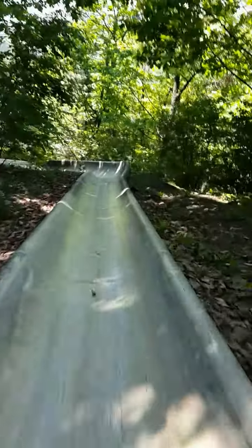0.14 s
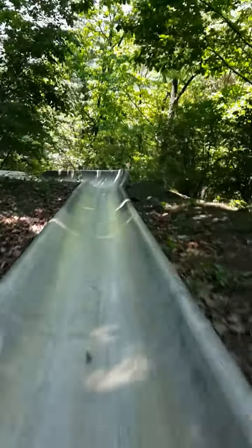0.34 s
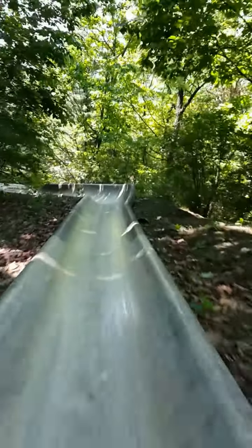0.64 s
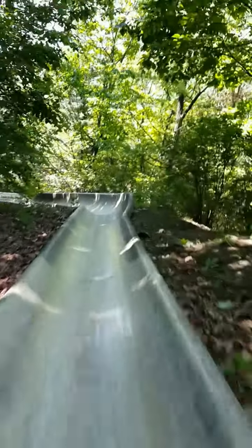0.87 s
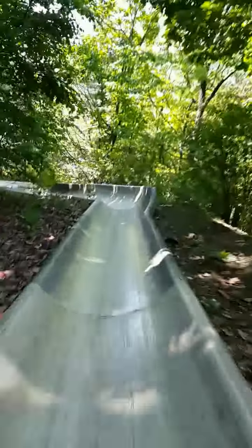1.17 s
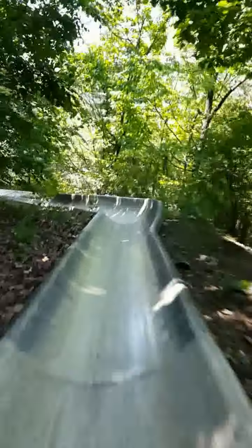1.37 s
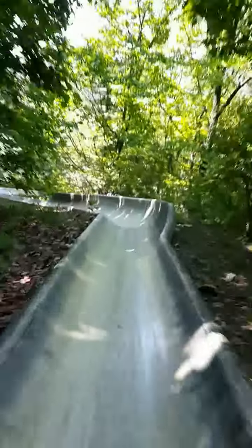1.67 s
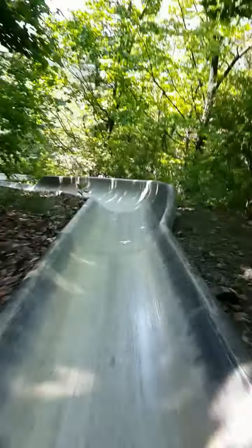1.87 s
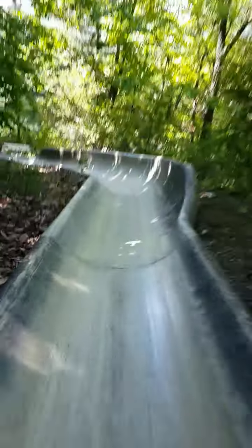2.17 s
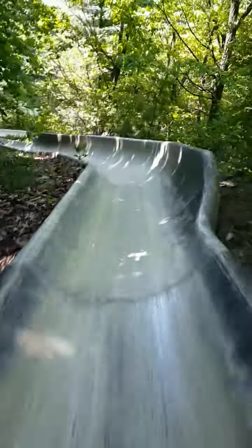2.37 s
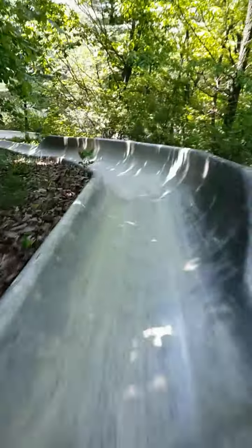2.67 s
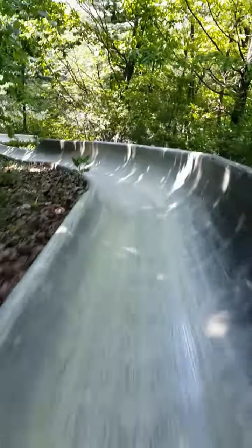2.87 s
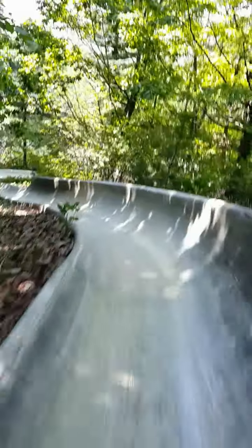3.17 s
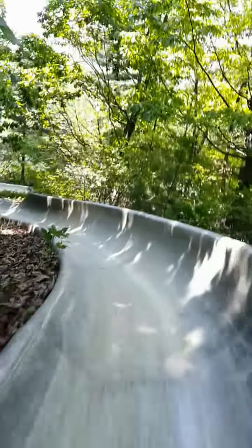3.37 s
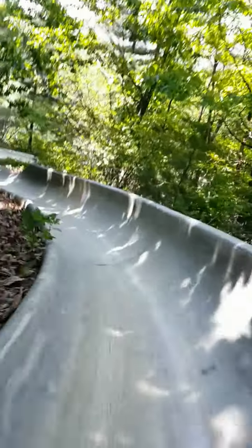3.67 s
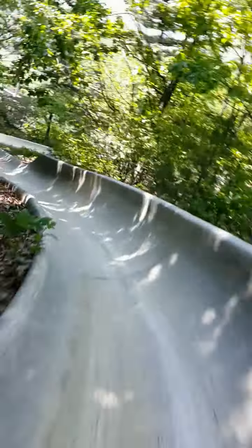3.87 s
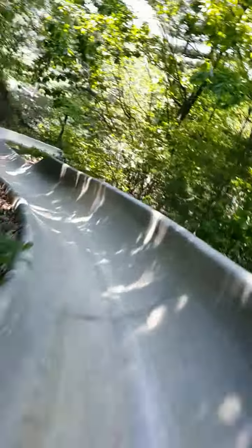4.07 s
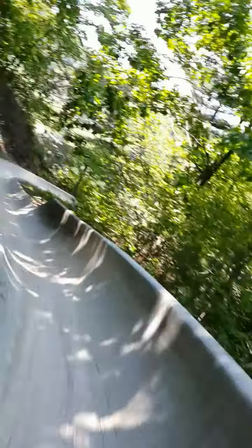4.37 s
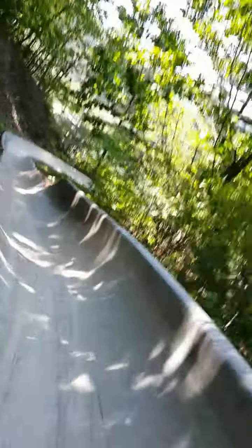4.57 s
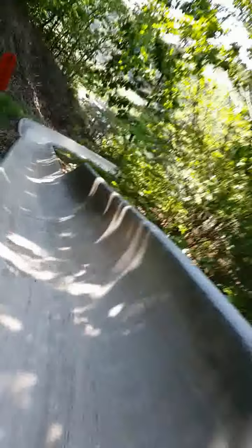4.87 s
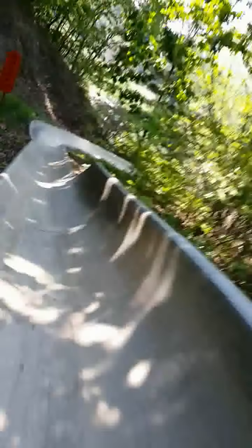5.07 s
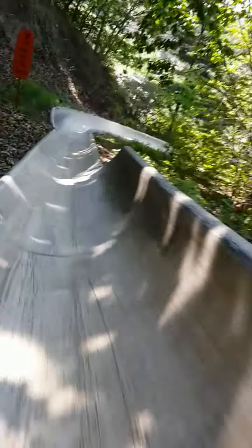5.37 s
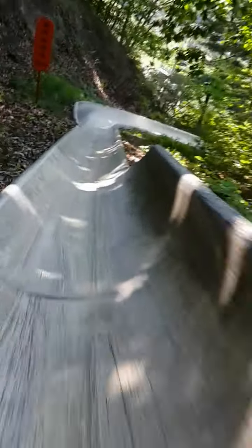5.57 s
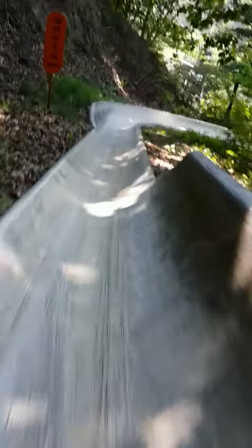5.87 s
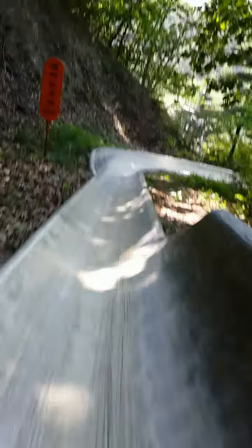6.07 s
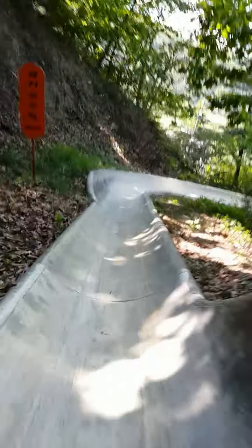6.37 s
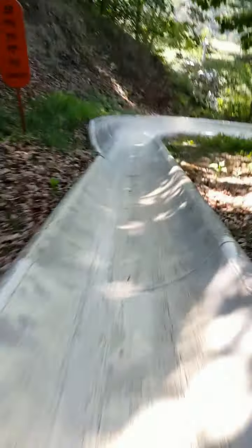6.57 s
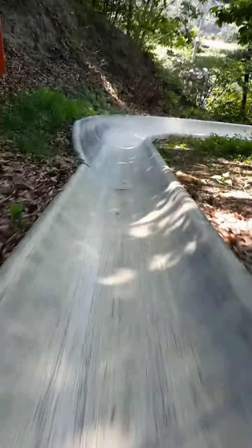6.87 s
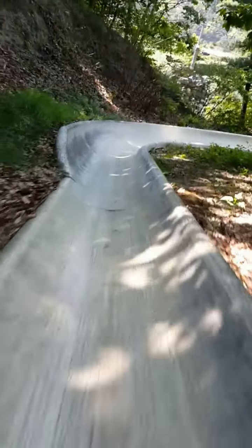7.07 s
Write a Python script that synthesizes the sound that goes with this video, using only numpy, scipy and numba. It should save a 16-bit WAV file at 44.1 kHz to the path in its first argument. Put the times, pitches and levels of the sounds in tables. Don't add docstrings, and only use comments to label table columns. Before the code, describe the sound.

A sled on rollers runs down a sheet-metal trough outdoors, captured very close by a handheld phone. Throughout there is a loud, bass-heavy rumble around 50 to 200 hertz, throbbing roughly eleven times a second, under muffled shell drone, loose rattling and faint gritty scraping. At 0.46 s a joint clanks and the trough slams low; a double knock and slam follow at 1.5, and more at 2.5. A loose panel hums around 1.7 and from 2.7 to 3.3. From 3.5 to 4.5 the bend makes the metal groan and sing in short spells, the scrape rising. The rumble drops away just before 4.57, then returns with the deepest slam. Knocks, chatter and ticks cluster at 5.3 to 5.5, then 6.2. The rumble thins near 6.5, slams at 6.7, a sharp snap cracks at 6.81, and rolling continues to the abrupt end at about 7.2.

```python
import sys
import numpy as np
from scipy import signal
from scipy.fft import rfft, irfft, next_fast_len
from scipy.io import wavfile
from scipy.ndimage import uniform_filter1d
from numba import njit

SR = 44100
rng = np.random.default_rng(int(sys.argv[2]) if len(sys.argv) > 2 else 0)


def rack_gain(trim_db):
    fader = np.asarray(trim_db, float)
    return 10 ** (fader / 20)


def to_wav(s):
    ch = np.atleast_2d(s).T
    pcm = np.round(np.clip(ch, -1, 1) * 32767)
    wavfile.write(sys.argv[1], SR, pcm.astype(np.int16))


N = 318843
SIZE = next_fast_len(N)
LOG_HZ = np.log(np.maximum(np.arange(SIZE // 2 + 1) * SR / SIZE, 1))
TIME = np.arange(N) / SR
COARSE_S = TIME[::16]
HIT_S = TIME[:SR // 5]


def curves(table):
    s, *columns = np.transpose(table)
    return [np.interp(TIME, s, c) for c in columns]


def swells(table, t=TIME):
    total = sum(db * np.exp(-.5 * ((COARSE_S - s) / max(width, .005)) ** 2) for s, db, width in table)
    return np.interp(t, COARSE_S, total)


def peaks(table):
    total = np.zeros(len(COARSE_S))
    for s, db, rise_s, fall_s in table:
        slope_s = np.where(COARSE_S < s, max(rise_s, .002), max(fall_s, .002))
        total += db * np.exp(-np.abs(COARSE_S - s) / slope_s)
    return np.interp(TIME, COARSE_S, total)


def walk(rate_hz):
    k = int(SR / rate_hz)
    steps = np.repeat(rng.standard_normal(N // k + 1), k)
    return 2.15 * uniform_filter1d(uniform_filter1d(steps, k), k)[:N]


def grit(rate_hz, spread_db, size=0.96):
    grains = (rng.random(N) < rate_hz / SR) * rack_gain(spread_db * rng.uniform(-0.58, 1, N))
    puffs = signal.lfilter([1], [1, -np.exp(-1 / (0.0023 * SR))], grains)
    return rng.standard_normal((2, N)) * (1 + size * puffs)


# pitch_hz, likeness_0_to_1, left_lead_rad, left_minus_right_db
PORT_DIFFERENCES = [(25, .7, .1, -2.5), (55.3, 1, 0.16, 3), (144, 1, 0.6, 2.5), (210, 0.91, 0.83, 2),
                    (306, 0.88, 1.14, 3), (448, 0.86, 1.78, 4), (770, 0.78, 3.12, 2.5),
                    (950, 0.6, 4.6, 2.5), (1150, 0.7, 4.56, -0.5), (1690, .35, 9.3, 1),
                    (2230, 0.03, 12.5, -1.5), (3300, 0.12, 7.4, 2), (4650, 0.15, 14, 4),
                    (6330, 0.3, 3.7, 4.5), (6700, 1, 32, 14.5)]


def ports():
    hz, like, lead_rad, db = np.transpose(PORT_DIFFERENCES)
    columns = (np.clip(like, 0, 1), lead_rad, db)
    like, lead_rad, db = (np.interp(LOG_HZ, np.log(hz), c) for c in columns)
    return like * np.exp(-1j * lead_rad) * rack_gain(-db), np.sqrt(1 - like ** 2) * rack_gain(-db)


def heard(pair, colour, right):
    hz, db = np.transpose(colour)
    gain = rack_gain(np.interp(LOG_HZ, np.log(hz), db, -120, -120))
    direct, scattered = rfft(pair, SIZE) * gain
    out = irfft(np.array([direct, right[0] * direct + right[1] * scattered]), SIZE)[:, :N]
    return out / np.std(out.mean(axis=0))


@njit
def revolve(fresh, lag, keep):
    y = np.zeros(len(fresh))
    for i in range(len(y)):
        back = i - int(lag[i])
        if back >= 0:
            y[i] = keep[i] * y[back] + np.sqrt(1 - keep[i] ** 2) * fresh[i]
        else:
            y[i] = fresh[i]
    return y


# time_s, turn_ms
TURNS = [(0, 96.5), (.8, 92.2), (1.3, 90.2), (3.35, 90.7), (4.4, 90), (4.9, 87.5), (5.6, 86.2),
         (6.15, 87.8), (7.23, 92)]
# time_s, lost_share
RENEWALS = [(1.5, .6), (2.47, .6), (3.53, .6), (4.55, .7), (5.4, .4), (6.15, .5), (6.7, .6), (7.1, .4)]


def roller_bumps():
    kept_share, renew_s = .8, .12
    keep = kept_share - swells([(s, lost, renew_s) for s, lost in RENEWALS])
    keep = np.clip(keep, 0, .95)
    lag = curves(TURNS)[0] * SR / 1000
    return np.array([revolve(row, lag, keep) for row in rng.standard_normal((2, N))])


# start_s, drumming_minus_boom_db, drone_db
SHEETS = [(0, -6, -1), (.5, -7.5, 0), (1.15, -15.5, -1), (1.75, -9.5, 0), (2.1, -21.5, -1.5),
          (2.45, -7.5, 0.5), (3.5, -13, 3.5), (3.8, -6.5, 2), (4.05, -6, 4), (4.57, -3.5, 5),
          (5.4, -7.5, 4), (6.05, -1, 4.5), (6.7, -5.5, 4), (6.95, -4, 0.5)]


def sheets():
    blend_s = 0.054
    s, *columns = np.transpose(SHEETS)
    under = np.maximum(np.searchsorted(s, TIME) - 1, 0)
    return [uniform_filter1d(c[under], int(blend_s * SR)) for c in columns]


# landing_s, lift_db, lead_in_s
HOPS = [(.464, -6.5, 0.016), (1.0, 1.5, 0.035), (1.597, -6, 0.15), (2.129, -3.5, 0.026), (2.416, -6, 0.052),
        (3.54, -12.5, 0.053), (4.569, -30.5, 0.068), (5.359, -8, 0.03), (6.67, -12, 0.043),
        (6.76, -3, 0.037), (7.26, -14, 0.11)]


def lift():
    landing_s = .02
    return peaks([(s, db, lead_s, landing_s) for s, db, lead_s in HOPS])


def stiffen(x):
    stiffening, width = .3, int(.016 * SR)
    size = uniform_filter1d(uniform_filter1d((x ** 2).mean(axis=0), width), width)
    return x * (np.maximum(size, 0) + .05) ** (-stiffening / 2)


# time_s, over_rest_db, half_width_s
PANEL_SWELLS = [(1.68, 17.5, 0.033), (1.95, 9.5, 0.05), (2.7, 14, 0.1), (3, 14, 0.12), (3.33, 16.5, 0.091)]
# pitch_hz, level_db
PANEL_HUM = [(215, -43.5), (240, 0.5), (253, -2), (266, -10), (295, -37.5)]


def panel(right):
    rest_db = -39.5
    return rack_gain(rest_db + swells(PANEL_SWELLS)) * heard(roller_bumps(), PANEL_HUM, right)


# time_s, over_rest_db, half_width_s
DECK_SWELLS = [(1, 8.5, 0.25), (1.5, 11.5, 0.11), (3.7, 6, 0.072), (3.97, 19, 0.19), (4.72, 17.5, 0.11),
               (5.5, 7, 0.46), (6.2, 14, 0.13), (7.03, 22, 0.014)]
# pitch_hz, level_db
DECK_RING = [(700, -41.5), (860, 0.5), (1000, -6.5), (1120, -2), (1350, -41)]


def deck(right):
    rest_db = -53
    return rack_gain(rest_db + swells(DECK_SWELLS)) * heard(grit(44, 3.1, 0.9), DECK_RING, right)


# time_s, rms_db, half_width_s, pitch_hz
SINGING = [(.35, -36, .03, 336), (1.1, -28, .06, 302), (3.3, -35.5, 0.086, 400), (3.57, -30.5, .03, 296),
           (3.75, -28, .025, 316), (3.88, -29, 0.08, 410), (4.0, -31.5, .04, 415), (3.9, -29.5, 0.11, 241),
           (4.16, -29, 0.022, 409), (4.24, -28, 0.048, 384), (4.35, -26, .04, 396), (4.35, -40, .015, 3510),
           (4.46, -38, .045, 3950), (4.62, -42.5, .02, 5040), (4.95, -38, .03, 4310),
           (4.27, -23, 0.065, 186), (6.72, -26, .05, 195), (4.72, -38, .03, 3200), (4.76, -40, .02, 4200),
           (2.04, -23, .06, 149), (5.46, -29.5, .015, 440), (5.485, -24, 0.017, 284),
           (5.8, -29, 0.069, 501), (6.0, -35, 0.035, 400), (6.3, -30, .04, 283), (6.33, -28.5, .025, 486),
           (6.4, -28, 0.017, 393), (6.52, -27.5, 0.037, 336), (6.59, -32, .025, 420)]


def singing(right):
    edges = 1 + np.array([-.5, .5]) * .1
    rough, out = rng.standard_normal((2, N)), np.zeros((2, N))
    for s, db, width_s, hz in SINGING:
        at = np.abs(TIME - s) < 3 * width_s + .05
        resonance = signal.butter(2, hz * edges, "bandpass", fs=SR, output="sos")
        tone = signal.sosfilt(resonance, rough[:, at])
        swell = np.exp(-.5 * ((TIME[at] - s) / max(width_s, .005)) ** 2)
        out[:, at] += rack_gain(db) * tone / np.std(tone) * swell
    direct, scattered = rfft(out, SIZE)
    return np.array([out[0], irfft(right[0] * direct + right[1] * scattered, SIZE)[:N]])


# time_s, peak_db, pitch_hz
TICKS = [(0.4495, -45, 5500), (.4615, -26, 5260), (.4625, -29, 3100), (1.4695, -25, 3400),
         (1.4693, -27, 1400), (0.465, -23.5, 1350), (5.325, -24.5, 1300), (.8854, -32, 3200),
         (1.3104, -28.5, 2920), (2.4768, -31, 3300), (2.573, -19, 1520), (2.5777, -29, 1700),
         (3.5543, -30, 3300), (4.457, -24, 3900), (5.3244, -20, 3300), (5.4742, -14.5, 3400),
         (5.4745, -16, 2300), (6.267, -19, 3300), (6.2664, -19, 2340), (6.8101, -5.5, 3750),
         (6.8105, -19.5, 2740), (6.8118, -20, 1800), (6.8135, -16, 3520), (6.8153, -21, 3000),
         (6.8257, -30, 3300), (6.829, -25, 3200), (2.5745, -25.5, 2100), (2.5755, -26, 1300),
         (.109, -36, 1300), (3.833, -21, 1150), (5.103, -18.5, 990), (4.572, -16, 1500)]


def ticks():
    out, cycles = np.zeros(N), 1.1
    for s, db, hz in TICKS:
        since = TIME - s
        out += rack_gain(db) * np.cos(2 * np.pi * hz * since) * np.exp(-(since * hz / cycles) ** 2)
    return out


# start_s, level_db, decay_s, upper_ring_db
CHATTER = [(.461, -33, 0.0061, -13), (0.467, -48, .012, 2), (1.47, -45, 0.0099, -7),
           (1.496, -39, 0.0099, -2), (1.527, -38, 0.038, -10.5), (2.478, -38.5, 0.032, -10),
           (2.575, -40, 0.027, -15), (4.7, -40.5, 0.044, -7.5), (4.91, -37, 0.064, -15),
           (4.537, -35, .006, -10), (4.618, -34, .008, 1), (5.324, -31, 0.013, -11),
           (5.338, -25, .014, -13), (5.37, -38, .01, -11), (5.465, -26, .012, -5), (6.812, -39, 0.004, -16),
           (6.825, -41, .008, -7)]
# pitch_hz, level_db
RUNNER_RING = [(2700, -31), (3050, 0), (3300, -5), (3600, -7), (4000, -33)]
RUNNER_TOP = [(4100, -26.5), (4500, -9.5), (5100, 4.5), (5400, -1.5), (5800, -27.5)]


def chatter(right):
    low, top = np.zeros((2, N))
    for s, db, decay_s, top_db in CHATTER:
        at = slice(int(s * SR), int(s * SR) + len(HIT_S))
        burst = (1 - np.exp(-HIT_S / 0.00083)) * np.exp(-HIT_S / max(decay_s, .002))
        low[at] = np.hypot(low[at], rack_gain(db) * burst)
        top[at] = np.hypot(top[at], rack_gain(db + top_db) * burst)
    return low * heard(grit(150, 2.5), RUNNER_RING, right) + top * heard(grit(170, 3), RUNNER_TOP, right)


# time_s, peak_db, dull_db, bright_db, clank_hz
KNOCKS = [(0.108, -27, 12.5, -23, 1160), (0.46, -15, -23, -12, 1336), (0.511, -23.5, 5, -16, 1200),
          (0.619, -21, 7.5, -13, 1040), (1.469, -19, -3, -11, 890), (1.485, -16, 2, -17, 910),
          (1.501, -23, -13, 0, 1050), (2.028, -30.5, 7, -11.5, 560), (2.475, -19.5, 2.5, -9.5, 830),
          (2.572, -17, 8, -15.5, 760), (2.817, -32.5, 14, -16, 560), (2.857, -35.5, 1, -19, 710),
          (2.968, -26, -1, -21.5, 950), (3.599, -17.5, -3, -10, 1310), (3.654, -27.5, -2, -27.5, 556),
          (3.832, -23.5, -5, -30.5, 1090), (3.923, -24, -3, -6, 1050), (4.536, -25.5, -2, -12.5, 1350),
          (4.57, -15.5, 10, -11, 1320), (4.5752, -18, -1, -12, 790), (4.586, -19, -6, -11.5, 950),
          (4.982, -15, -12.5, -29, 644), (5.103, -17.5, -23, -22, 930), (5.19, -21.5, 9, -23, 600),
          (5.324, -17.5, -1, -10, 1150), (5.343, -21, 12, -5, 820), (5.456, -14.5, -4, -28, 950),
          (5.473, -21.5, 9, -12.5, 1200), (5.764, -26, 3, -17.5, 566), (6.18, -17, 7.5, -14.5, 910),
          (6.187, -17.5, -19, -18, 870), (6.266, -17.5, 6.5, -27, 915), (6.732, -20, 6, -12.5, 740),
          (7.023, -23, -12, -28, 1060)]
# pitch_hz, level_db
SHELL = [(150, -25), (200, 3), (225, -1.5), (255, 0), (285, -1.5), (420, -0.5), (520, -6), (650, -23),
         (900, -43)]
RATTLE = [(400, -29.5), (550, 0), (700, 6), (950, -2), (1150, -7), (1500, -12), (1700, -18), (2000, -49.5)]
RUB = [(1200, -35), (1500, -4), (1700, -2), (2300, -8.5), (2600, -12.5), (3100, -39.5)]
GRIT = [(1900, -38.5), (2400, -8), (2900, -2.5), (3300, 0.5), (3750, -2.5), (4500, -3.5), (5300, -7.5),
        (6200, -12.5), (6700, -13.5), (7200, -11.5), (7400, -53)]


def knocks(right):
    ring_cycles, thump_hz, thump_s, port_lag_s = 104, 328, 0.008, 0.00086
    dull, middle, bright, clank = np.zeros((4, N))
    thump = np.sin(2 * np.pi * thump_hz * HIT_S) * np.exp(-HIT_S / thump_s)
    for s, db, dull_db, bright_db, hz in KNOCKS:
        at = slice(int(s * SR), int(s * SR) + len(HIT_S))
        burst = (1 - np.exp(-HIT_S / 0.00015)) * np.exp(-np.log(1000) * HIT_S * hz / ring_cycles)
        dull[at] = np.hypot(dull[at], rack_gain(db + dull_db - 5.0) * burst)
        middle[at] = np.hypot(middle[at], rack_gain(db - 9.5) * burst)
        bright[at] = np.hypot(bright[at], rack_gain(db + bright_db - 4.5) * burst)
        clank[at] += rack_gain(db - 4) * np.sin(2 * np.pi * hz * HIT_S) * burst * np.exp(-HIT_S / 0.0056)
        clank[at] += rack_gain(db + dull_db - 3.0) * thump
    parts = ((dull, SHELL), (middle, RATTLE), (middle * rack_gain(-9.0), RUB), (bright, GRIT))
    bursts = sum(shape * heard(rng.standard_normal((2, N)), colour, right) for shape, colour in parts)
    return bursts + np.array([clank, np.roll(clank, int(port_lag_s * SR))])


# time_s, peak_db, pitch_hz
SLAMS = [(0.4672, -6.5, 135.2), (1.475, -7.5, 125.9), (2.471, -9.5, 109.5), (3.4, -11.5, 95.4),
         (4.573, -4.5, 174.4), (5.471, -12.5, 134.7), (6.68, -6.5, 130)]


def slams(right):
    swing, decay_cycles = np.zeros(N), 3.7
    for s, db, hz in SLAMS:
        cycles = np.maximum(TIME - s, 0) * hz
        swing -= rack_gain(db) * np.sin(2 * np.pi * cycles) * np.exp(-cycles / decay_cycles)
    return np.array([swing, irfft(rfft(swing, SIZE) * right[0], SIZE)[:N]])


# time_s, scrape_db, rub_db
SLIDE = [(0, -41, -6.5), (.35, -47, -1.5), (.8, -49, -1.5), (1.0, -46.5, -2.5), (1.4, -44, -0.5),
         (1.95, -44, -3.5), (2.3, -41.5, -3), (3, -44, -4.5), (3.5, -41, -4.5), (4.25, -41, -2.5),
         (4.36, -40, -7), (4.72, -32, -5), (4.98, -36, -2), (5.25, -40.5, -1.5), (5.7, -41.5, -5.5),
         (6, -42, 0.5), (6.45, -37, -1), (7.23, -33, -3)]
# peak_s, level_db, rise_s, fall_s
SCUFFS = [(0, 0.5, .01, 0.15), (.47, 7, .005, 0.092), (.95, 7.5, 0.036, 0.028), (1.12, 3.5, 0.044, 0.067),
          (1.74, 2.5, 0.075, 0.03), (1.468, 0.5, .002, 0.19), (1.505, 4, 0.0091, 0.1), (2.3, 1, .1, 0.13),
          (3.2, 1.5, 0.066, 0.089), (3.47, 5, 0.037, 0.026), (3.92, 5.5, 0.012, 0.11),
          (4.34, 6.5, 0.0098, 0.11), (4.46, 2.5, 0.023, 0.03), (4.71, 3.5, 0.01, 0.044),
          (4.95, 4, 0.021, 0.057), (5.33, 9.5, 0.016, 0.042), (5.462, 7.5, 0.0028, 0.16),
          (5.8, 5.5, 0.032, 0.1), (6.1, 4.5, 0.071, 0.088), (6.27, 2, 0.024, 0.13),
          (6.66, -6.5, 0.038, 0.049), (6.74, 0, 0.01, 0.013), (6.82, -1.5, 0.012, 0.036),
          (6.96, -4, 0.03, 0.24)]
# time_s, level_db, half_width_s
SURGES = [(.33, 4.5, 0.016), (.88, 2.5, 0.034), (.97, 7, 0.027), (1.22, -4.5, 0.029), (1.67, 2, .03),
          (1.97, 4.5, 0.021), (2.35, 7.5, 0.017), (2.42, -4, 0.046), (2.72, -0.5, 0.07), (3.3, 3, 0.04),
          (3.9, 3, 0.046), (4.52, -6.5, 0.036), (5.18, -4, 0.052), (5.47, 2, 0.041), (5.85, 0, 0.046),
          (6.04, 3.5, 0.021), (6.1, 0, 0.025), (6.32, 7, 0.012), (6.46, -14, 0.011), (6.59, 4, 0.12),
          (6.65, -14, 0.015), (7.03, 4, 0.032)]


def sliding(right):
    press_db, rub_db = curves(SLIDE)
    scrape_db = press_db + peaks(SCUFFS)
    rattle_db = -37 + 0.23 * (press_db - press_db.mean()) + 0.35 * sheets()[1] + 0.53 * swells(SURGES)
    rattle_db = rattle_db - scrape_db
    flutter = walk(9)
    grains = grit(45, 1.5, size=.45)
    scrape = heard(grains, GRIT, right) * rack_gain(.4 * walk(20))
    rub = heard(grains, RUB, right) * rack_gain(rub_db - 2.0 + 0.58 * walk(16))
    rattle = heard(grit(37, 5.9, 0.79), RATTLE, right) * rack_gain(rattle_db - 1.5 + 0.54 * walk(4.2))
    return rack_gain(scrape_db + 0.29 + 0.57 * flutter) * (scrape + rub + rattle)


# time_s, load_db, thud_depth_db
LOAD = [(0, -14.5, -9.5), (.55, -16, -7), (.9, -16.5, -0.5), (1.2, -10.5, -16.5), (1.7, -15.5, -6),
        (2.3, -17, -10.5), (2.55, -18, -3.5), (3.1, -15, -8.5), (3.48, -18.5, 4.5), (3.58, -15.5, -20),
        (3.95, -16, -10.5), (4.12, -18.5, -4), (4.68, -19, -15), (5.2, -12.5, -18), (5.9, -14.5, -16.5),
        (6.2, -17, -3.5), (6.5, -22, -6.5), (7.23, -16, -3.5)]
# peak_s, level_db, rise_s, fall_s
JOLTS = [(.545, -8, .012, .012), (.73, -10, .012, .01), (.895, -4, .012, .012), (5.3, -5.5, 0.014, .015),
         (5.76, -4.5, 0.016, 0.014), (5.88, -5.5, .015, .015), (.7, 5.5, 0.017, 0.075),
         (1.17, 1.5, 0.021, .02), (2.07, 2.5, .02, 0.0205), (2.48, 5.5, 0.0066, 0.0083),
         (2.572, 4, 0.006, .008), (3.26, 9.5, 0.0098, 0.0099), (4.28, 5, 0.027, 0.12),
         (5.11, 3.5, 0.023, 0.013), (6.32, -4, 0.022, 0.023), (6.58, 8.5, 0.0084, 0.031),
         (6.69, 15.5, 0.0072, 0.0083), (6.92, 6.5, 0.011, 0.034), (3.45, 8, 0.046, 0.024),
         (6.22, -4, 0.028, 0.023)]
# swing_db, lead_rad
WOBBLE = [
    (3, -2.9),
    (2, -2.5),
    (9, .2),
    (1.2, -1.5),
]
# time_s, over_rest_db, half_width_s
WALL_SWELLS = [(1.95, 9.5, 0.12), (3.65, -1, 0.069), (4.17, 20, 0.095), (4.62, 1, .05), (4.88, 15.5, 0.15),
               (5.65, 9, 0.1)]
# pitch_hz, level_db
THUD = [(20, -48), (40, -38), (55, -11.5), (68, -2.5), (90, -2.5), (105, -6), (130, -28)]
BOOM = [(70, -40), (90, -9.5), (105, 0), (128, 4.5), (145, -1.5), (160, -10), (185, -51.5)]
DRUM = [(125, -29.5), (142, 2.5), (155, -1), (170, 4), (185, -13.5), (210, -21), (260, -34)]
WALL_DRUM = [(150, -32), (165, -2), (180, 1), (200, -7.5), (230, -34)]


def rollers(right):
    load_db, depth_db = curves(LOAD)
    drum_db, drone_db = sheets()
    lift_db, bumps = lift() + peaks(JOLTS), roller_bumps()
    angle = 2 * np.pi * np.cumsum(1000 / curves(TURNS)[0] / SR)
    thud_wob, boom_wob, drum_wob, shell_wob = (db * np.cos(angle + lead) for db, lead in WOBBLE)
    drum_wob = drum_wob * np.where(TIME < 4.9, 1, .45)

    boom = rack_gain(lift_db + boom_wob) * stiffen(heard(bumps, BOOM, right))
    thud = rack_gain(0.21 * lift_db + depth_db + thud_wob) * stiffen(heard(bumps, THUD, right))
    drum = rack_gain(lift_db + drum_db + drum_wob) * stiffen(heard(bumps, DRUM, right))
    wall_db = -29.5 + swells(WALL_SWELLS)
    wall = rack_gain(lift_db + wall_db + drum_wob) * heard(bumps, WALL_DRUM, right)
    oval_db = 1.2 * np.cos(2 * angle)
    trough = rack_gain(load_db + oval_db) * (boom + thud + drum + wall)

    shell = heard(0.64 * bumps + 0.77 * grit(30, 4.5), SHELL, right) * rack_gain(0.9 * walk(14))
    shell_db = -28.5 + drone_db + 0.11 * (load_db - load_db.mean()) + 0.073 * lift_db
    shell_db = shell_db + shell_wob + swells(SURGES)
    throb_db = 0.58 * walk(30)
    return rack_gain(throb_db) * (trough + rack_gain(shell_db) * shell)


def scene():
    right = ports()
    track = panel(right) + deck(right) + singing(right)
    hits = ticks() + chatter(right) + knocks(right) + slams(right)
    return track + hits + sliding(right) + rollers(right)


def band_limit(x):
    return signal.sosfilt(signal.butter(12, 7310, fs=SR, output="sos"), x)


def record(dry):
    bass_cut = signal.butter(2, 33.5, "highpass", fs=SR, output="sos")
    thinned = signal.sosfilt(bass_cut, dry)
    limited = .97 * np.tanh(thinned / .97)
    return band_limit(limited)


dry = scene()
out = record(dry)
to_wav(out)
```